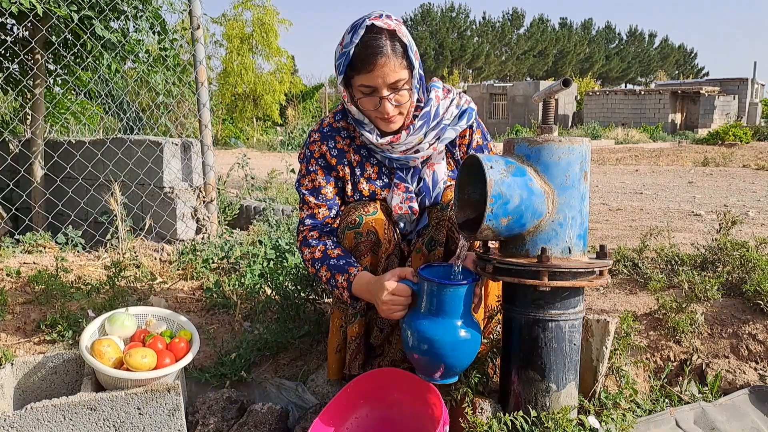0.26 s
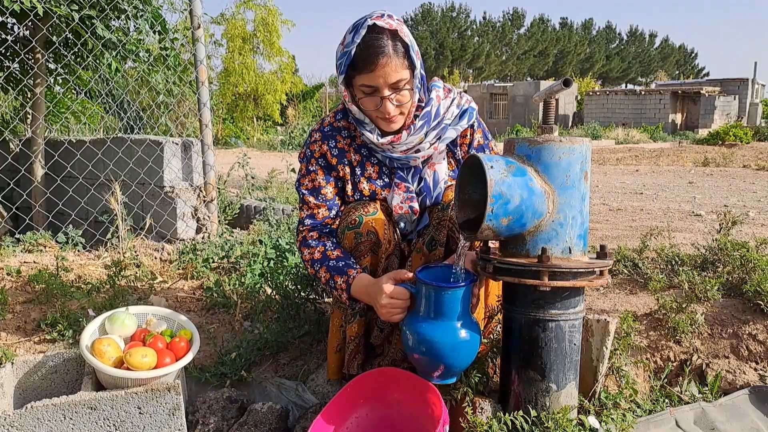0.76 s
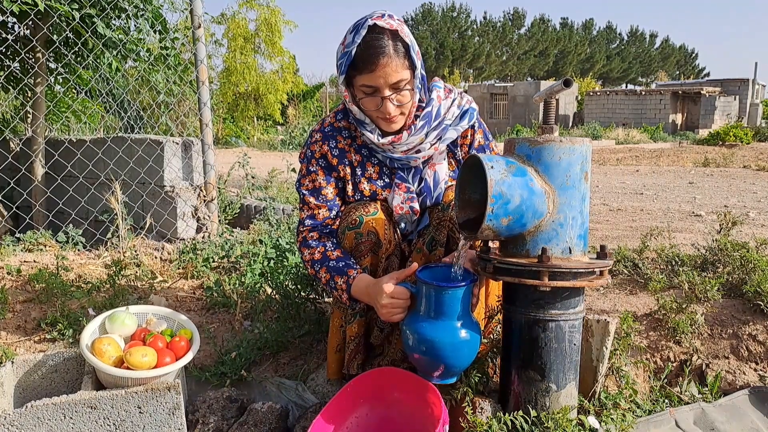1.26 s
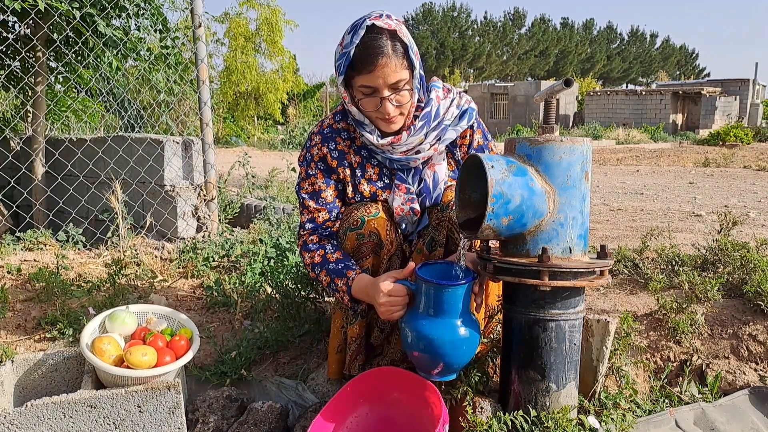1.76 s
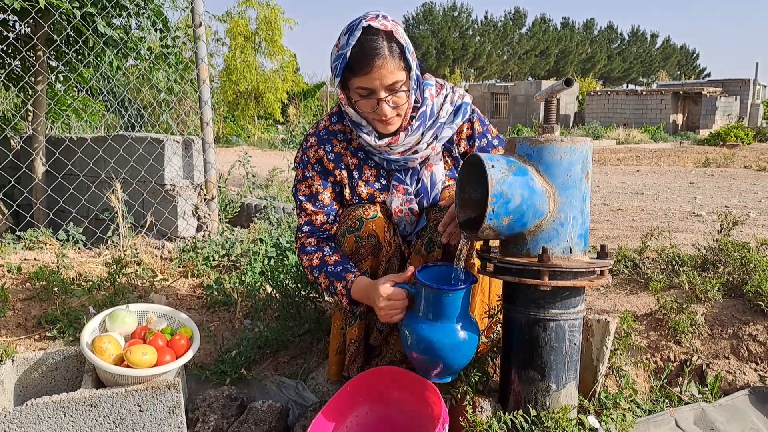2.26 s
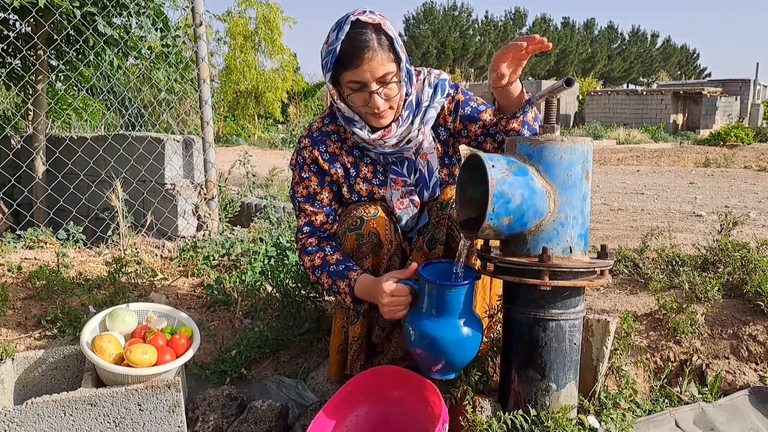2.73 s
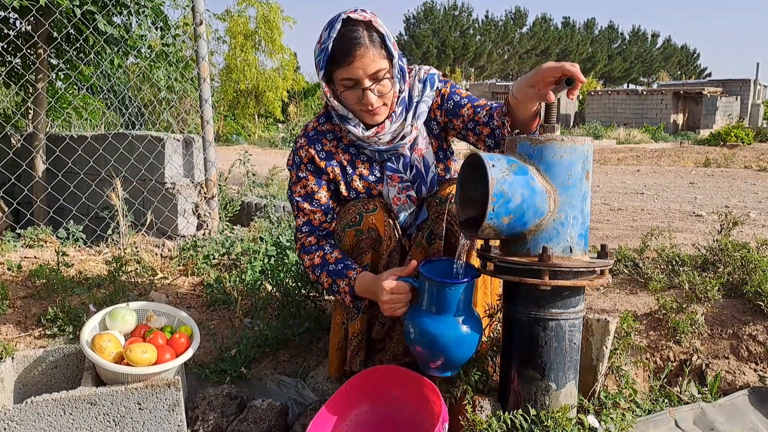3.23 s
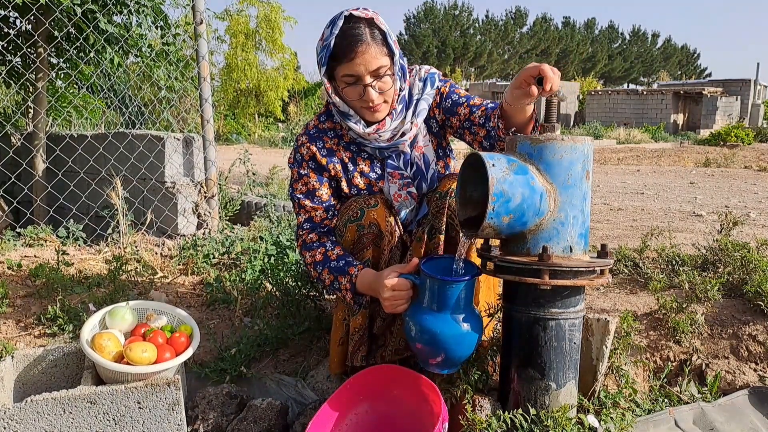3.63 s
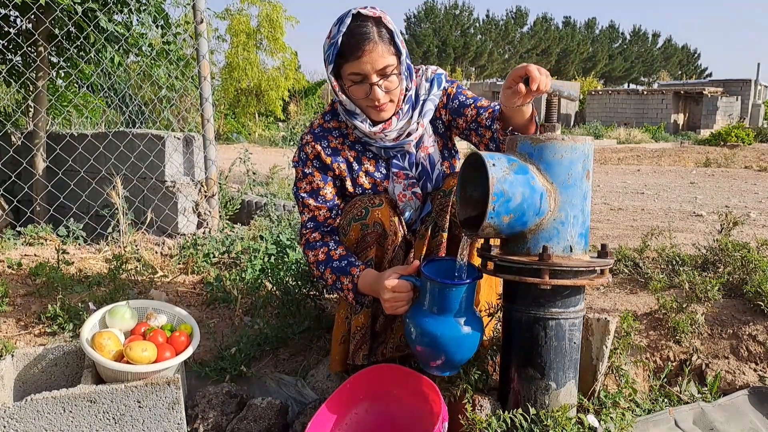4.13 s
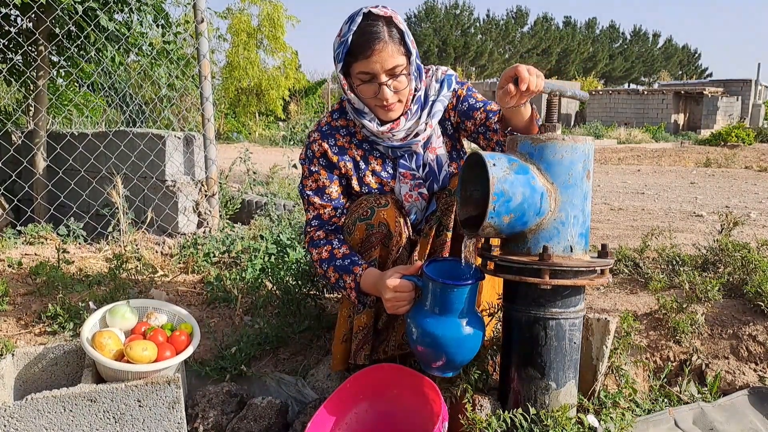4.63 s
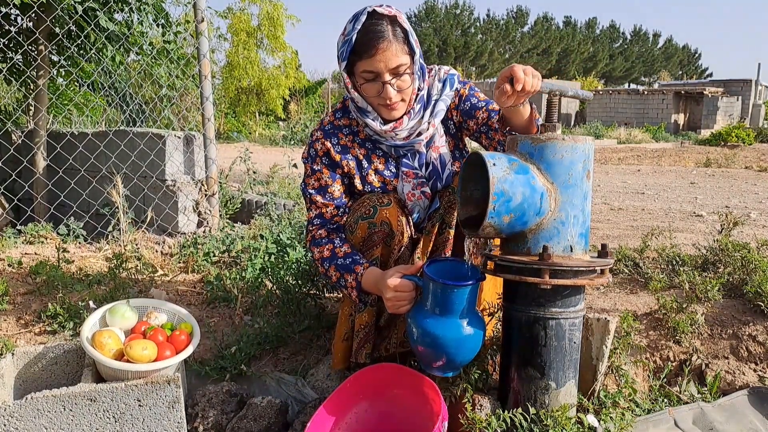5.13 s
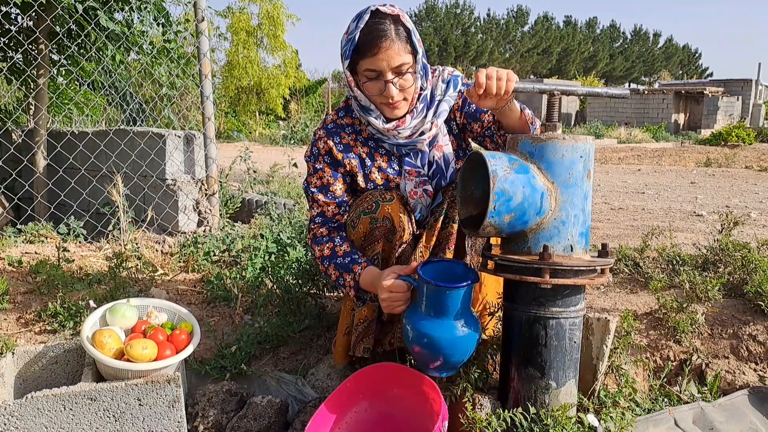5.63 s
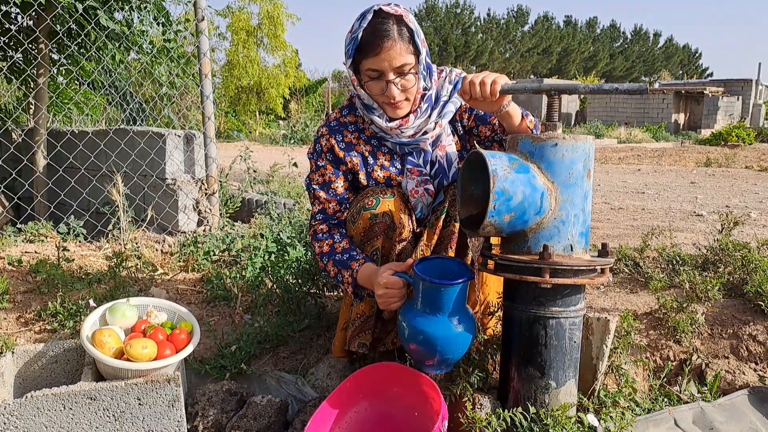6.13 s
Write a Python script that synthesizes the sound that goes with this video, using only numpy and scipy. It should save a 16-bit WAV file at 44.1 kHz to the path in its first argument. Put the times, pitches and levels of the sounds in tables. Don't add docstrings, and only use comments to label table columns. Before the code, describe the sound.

Near, dry outdoor stereo sound, with a deep, slightly wavering motor hum far away and soft low breeze throughout. From 0 s a modest stream falls into a hollow jug, with glugging gulps, tiny wall pings and crisp spitting drops; at about 0.4 s a hand's grip stutters dully on the jug. Gulps rise a little in pitch and are strongest from 1.2 to 2 s. At 1.4 s the jug strikes the pipe: one hard, rattling metallic knock with a short ring, spill and slosh. From about 2.8 s, gulps thin out and the jug's ringing shifts brighter; small gurgles and quick, higher plops take over. A busy burst of plops and sharp splats comes around 4.6 to 5.1 s. After 5.2 s the stream weakens, with a dull slosh near 5.4 s, then only sparse fine drips. At about 6.2 s a sleeve rustles faintly over metal, until 6.4 s.

```python
import sys
import numpy as np
from scipy import signal
from scipy.fft import rfft, irfft, next_fast_len
from scipy.io import wavfile
from scipy.ndimage import uniform_filter1d

SR = 44100
rng = np.random.default_rng(int(sys.argv[2]) if len(sys.argv) > 2 else 0)


def wav_out(sig):
    wavfile.write(sys.argv[1], SR, np.round(np.clip(np.atleast_2d(sig).T, -1, 1) * 32767).astype(np.int16))


def to_linear_factor(level_db):
    exponent = np.asarray(level_db, float) / 20
    return 10 ** exponent


N = 281799
TIME = np.arange(N) / SR
PUFF_TIME = np.arange(1500) / SR

# time in seconds, level in dB.
STREAM = [(0.0, -63), (0.85, -62), (1.57, -58), (1.78, -63), (2.42, -58), (3.01, -65.5), (3.2, -61),
          (3.43, -62.5), (3.88, -62.5), (4.04, -63.5), (4.4, -64), (4.63, -63.5), (4.95, -60),
          (5.18, -64.5), (5.37, -66), (5.63, -72), (5.8, -67.5), (6.19, -78.5)]
# pitch in Hz, width in Hz, level in dB.
WATER_SURFACE = [(1050, 430, 0.5), (1600, 210, -1), (2000, 270, 0)]
# start in seconds, end in seconds, pitch in Hz,
# drift in Hz per second, level in dB, fade in dB per second.
CROSS_RINGS = [
    (0, 3.8, 1728, -41, -63, -2.5),
    (2.85, 4.7, 2087, 30, -59.5, -4),
]
# pitch in Hz, width in Hz, level in dB.
WALL_UPRIGHT = [(3140, 94, 6), (3450, 360, -1), (3770, 420, 1.5)]
WALL_LEANING = [(2980, 220, 1.8), (3460, 250, 7), (3750, 340, 1)]
WALL_NEARLY_FULL = [(3020, 470, 4.5), (3400, 230, -6), (4080, 190, 0)]
# time in seconds, peak in dB, pitch in Hz.
LARGE_GULPS = [(0.046, -32, 511), (0.341, -38.5, 518), (0.457, -37, 454), (0.658, -36, 624),
               (0.781, -34.5, 637), (0.826, -33, 613), (0.851, -34, 646), (1.05, -33, 595),
               (1.158, -33.5, 607), (1.233, -32.5, 617), (1.253, -27.5, 621), (1.292, -35, 640),
               (1.474, -25, 597), (1.515, -32.5, 630), (1.669, -27.5, 634), (1.788, -32, 623),
               (1.873, -33, 665), (1.925, -33, 660), (1.951, -26, 630), (1.987, -31, 640), (2.02, -34, 693),
               (2.09, -36, 660), (2.145, -35, 612), (2.464, -39, 617), (2.523, -38, 660), (2.643, -34, 710),
               (2.822, -39, 667), (2.946, -38.5, 690), (3.105, -39, 665), (3.172, -35.5, 688)]
# time in seconds, peak in dB.
LITTLE_GULPS = [(.095, -40), (.51, -43), (.619, -39), (.704, -42), (.98, -43), (1.1, -50), (1.36, -47),
                (1.61, -37.5), (1.73, -40.5), (2.054, -41), (2.12, -38), (2.252, -40), (2.33, -53),
                (2.44, -43), (2.55, -38), (2.58, -48), (3.35, -41)]
# time in seconds, peak in dB, pitch in Hz.
DEEP_PLOPS = [(2.798, -38.5, 940), (3.942, -35.5, 1130), (3.992, -41.5, 710), (4.108, -40.5, 1046),
              (4.288, -39, 980), (4.472, -38.5, 1190), (4.76, -37.5, 1075), (5.039, -37, 1095),
              (5.262, -39, 1160), (4.605, -30, 1017), (4.83, -39, 950), (4.851, -33, 600),
              (4.853, -32.5, 1000), (4.25, -39, 1090), (4.31, -39, 1050), (4.66, -41, 1050),
              (4.9, -42, 980), (4.882, -31, 1050), (4.989, -36, 1000), (5.02, -38, 830), (5.098, -33, 1016),
              (5.305, -34.5, 967), (5.326, -39.5, 890)]
# time in seconds, peak in dB, pitch in Hz.
SMALL_BUBBLES = [(0.0481, -38.5, 1675), (0.249, -46.5, 1700), (0.4184, -48, 3730), (0.6176, -44.5, 3140),
                 (0.854, -44, 2760), (1.186, -46, 3700), (1.3416, -45, 3100), (1.4099, -26.5, 1660),
                 (1.5878, -39, 1680), (1.713, -44, 3150), (1.9711, -43, 2120), (2.285, -44, 3070),
                 (2.398, -41.5, 1660), (2.4185, -46, 3160), (2.5566, -52, 1560), (2.6923, -42.5, 2140),
                 (2.985, -42, 2090), (3.012, -41, 3000), (3.012, -41, 1510), (3.467, -37, 2000),
                 (3.5568, -41, 2090), (3.697, -46, 3440), (3.8394, -42.5, 2140), (3.886, -38, 2130),
                 (3.9684, -50, 1660), (3.985, -41, 2130), (3.621, -44, 2150), (4.32, -45, 3450),
                 (4.511, -50, 3400), (4.586, -43, 3460), (4.599, -36, 2130), (4.958, -47, 3500),
                 (6.2884, -43, 2800)]
# time in seconds, peak in dB, pitch in Hz.
WALL_PINGS = [(0.0365, -43, 3210), (0.1039, -51, 3130), (0.2503, -39, 3690), (0.4815, -52, 3770),
              (0.4963, -44, 2700), (0.5494, -45, 3140), (0.5776, -44, 3130), (0.6958, -63, 3140),
              (0.8, -50, 3250), (0.852, -40.5, 3800), (1.0021, -48, 3180), (1.214, -49, 3700),
              (1.274, -49, 3140), (1.512, -43, 3130), (1.586, -44, 3140), (1.672, -48, 3140),
              (1.6901, -46, 3050), (1.7659, -47, 3200), (1.8018, -43, 3170), (1.9505, -53, 3050),
              (2.138, -46, 3130), (2.5206, -44, 3120), (2.558, -43.5, 3210), (2.6932, -43, 3100),
              (3.011, -50, 2980), (3.2725, -47, 4160), (3.431, -46, 3020), (3.4752, -39.5, 3370),
              (3.5284, -47.5, 3410), (3.602, -46, 3420), (3.7628, -50, 3450), (3.8646, -44.5, 3530),
              (3.8851, -45.5, 3020), (3.9928, -50, 3440), (4.0307, -49, 2990), (4.1325, -44.5, 3460),
              (4.2757, -46, 3400), (4.491, -52, 3450), (4.545, -44, 3750), (4.6354, -48, 3400),
              (4.6568, -46, 3530), (4.7401, -48, 3430), (4.8818, -47, 3390), (5.0904, -49, 3970),
              (5.132, -49, 3750), (6.2707, -51, 3200), (6.2872, -46, 3000)]
# pitch in Hz, width in Hz, level in dB.
PING_SPLASH = [(1700, 980, -6.5), (2700, 540, 0.5), (3550, 1040, 3.5), (5170, 1900, -4.5)]
# time in seconds, peak in dB, pitch in Hz.
GURGLE_BUBBLES = [(0.483, -44.5, 1240), (0.618, -41.5, 1110), (0.72, -46, 1170), (0.928, -42.5, 1080),
                  (1.157, -44, 1110), (1.965, -39, 1040), (2.347, -43.5, 990), (2.481, -45, 1060),
                  (2.742, -41.5, 781), (2.823, -42, 1000), (2.989, -41, 1070), (3.073, -40.5, 1050),
                  (3.284, -42, 870), (3.434, -43, 866), (3.494, -45.5, 1160), (3.536, -52, 940),
                  (3.553, -45, 950), (3.572, -44, 835), (3.617, -44, 781), (3.649, -49, 950),
                  (3.711, -46, 870), (3.755, -41, 781), (3.801, -46, 861), (3.876, -45, 834),
                  (4.027, -42, 990), (4.063, -42.5, 870), (4.147, -51, 1110), (4.163, -47, 969),
                  (4.202, -48, 1100), (4.344, -46, 1020), (4.458, -43.5, 1200), (4.522, -47, 1150),
                  (4.554, -44, 947), (4.566, -43, 1080), (4.642, -46, 1140), (4.704, -44, 834),
                  (4.795, -47, 1230), (4.965, -45, 1000), (5.137, -51, 1170), (5.171, -45, 1120),
                  (5.361, -48, 1166), (5.399, -45, 991), (5.45, -44, 1170), (5.506, -49, 1200),
                  (5.535, -45.5, 940)]
# start in seconds, length in seconds, level in dB.
ROCKING = [
    (1.467, 0.35, -49.5),
    (2.3, 0.19, -54.5),
    (3.15, 0.14, -54),
    (3.55, 0.34, -61),
    (5.427, 0.18, -50.5),
]
# pitch in Hz, width in Hz, level in dB.
JUG_BELLY = [(180, 75, -1), (286, 190, -4)]
# pitch in Hz, width in Hz, level in dB.
DROPLETS = [(5360, 2600, -0.5), (6320, 690, 3.5), (7980, 1440, 8), (10970, 4400, 2), (11500, 2200, -1),
            (14800, 1400, -5)]
# time in seconds, peak in dB.
LARGE_DROPS = [(0.25, -39), (0.2554, -25.5), (0.291, -32), (0.433, -34.5), (0.5744, -35.5), (1.208, -36),
               (1.288, -35), (1.363, -34), (1.6912, -31.5), (2.0894, -39), (2.1239, -35), (2.331, -34),
               (2.3825, -32), (2.4207, -33), (2.458, -43), (2.58, -30.5), (2.9687, -35.5), (3.231, -31),
               (3.467, -35), (3.6465, -35.5), (3.83, -27), (3.88, -32.5), (3.935, -35), (4.0798, -34),
               (4.1316, -28.5), (4.1485, -28), (4.879, -25), (4.9762, -28.5), (5.097, -31), (5.724, -37.5),
               (6.12, -39.5)]
# time in seconds, peak in dB.
SPOUT_DROPS = [(0.092, -31.5), (0.3433, -35), (0.851, -37), (0.8776, -27), (1.1009, -40), (1.523, -29),
               (1.5587, -32.5), (1.672, -32), (1.792, -34), (1.952, -35.5), (2.0506, -33.5),
               (2.5307, -26.5), (2.699, -30), (2.899, -36.5), (3.2566, -34.5), (3.555, -29), (3.6924, -34),
               (3.986, -26.5), (4.0384, -34.5), (4.184, -35.5), (4.276, -37), (4.552, -34.5),
               (4.754, -28.5), (4.7902, -31), (4.8282, -24.5), (4.852, -29.5), (4.932, -35), (5.021, -32),
               (6.251, -38)]
# time in seconds, peak in dB, pitch in Hz.
FINE_DROPS = [(0.128, -39, 13900), (0.1855, -43, 11200), (0.2394, -51, 7650), (1.003, -39, 8700),
              (1.0196, -40, 7600), (1.1438, -40, 7640), (1.2506, -42, 8390), (1.504, -40, 12900),
              (1.8726, -39.5, 6200), (2.079, -39.5, 8610), (2.16, -39, 8550), (2.285, -43, 8340),
              (2.3181, -41, 8550), (2.4862, -35.5, 8200), (2.6798, -48, 10900), (2.8814, -45, 7900),
              (3.009, -40, 7850), (3.116, -37.5, 8480), (3.22, -38, 8010), (3.434, -39, 7860),
              (4.0228, -39, 7900), (4.115, -37.5, 8190), (4.358, -40.5, 8250), (4.452, -41.5, 5100),
              (4.6982, -43, 11200), (4.9067, -36, 10900), (4.9651, -35, 5010), (5.0784, -40, 7990),
              (5.1317, -43, 8700), (5.197, -39, 7830), (5.2614, -44, 11400), (5.2759, -42, 8260),
              (5.3252, -42, 11300), (5.3567, -52, 8150), (5.4141, -49, 11300), (5.454, -44, 12500),
              (5.4645, -45, 6300), (5.5134, -49, 6210), (5.706, -53, 7950), (5.7564, -55, 7850),
              (5.864, -47, 8530), (6.1439, -49, 11600), (6.201, -46, 12100), (6.243, -39.5, 10300),
              (6.271, -42, 12100), (6.289, -41, 12500), (6.302, -37, 13800), (6.3415, -38, 5600),
              (6.353, -38, 10700)]
# pitch in Hz, width in Hz, level in dB.
KNOCK_RATTLE = [(520, 300, -3), (980, 350, -16), (1660, 140, 0.5), (2230, 250, 4.5), (3310, 140, -5),
                (3410, 180, -3.5), (4400, 760, -20), (5550, 470, -9.5), (6630, 1000, -7), (8200, 2500, -18)]
# pitch in Hz, level in dB, time to fade by 60 dB in seconds.
PIPE_RING = [(1700, -36, .16), (2150, -31.5, 0.21), (3435, -32, 0.1), (4280, -51, 0.038), (6600, -37, .1)]
# time in seconds, level in dB.
GRIP_SHIFT = [(.39, -50), (.399, -40), (.406, -38), (.42, -43), (.434, -37.5), (.448, -42), (.46, -36.5),
              (.468, -41), (0.474, -60), (.5, -70)]
# time in seconds, level in dB.
SLEEVE_BRUSH = [(6.2, -81), (6.235, -66), (6.248, -58), (6.28, -57), (6.31, -64), (6.335, -55), (6.39, -59)]
# time in seconds, level in dB.
MOTOR_HUM = [(0.0, -41), (0.09, -44), (0.16, -67), (0.28, -37.5), (0.51, -47), (0.62, -39.5), (0.76, -42.5),
             (1.3, -32.5), (2.47, -35.5), (2.7, -43), (3.13, -36), (3.84, -32.5), (4.36, -41),
             (5.71, -32.5), (6.21, -35), (6.39, -43)]
# pitch in Hz, level in dB.
SHAFT_HUMS = [(50, -53), (68, -55), (138, -65.5)]
# pitch in Hz, level in dB per Hz.
AIR_COLOUR = [(12, -82), (26, -39), (40, -24), (58, -7), (91, -5.5), (113, -17), (165, -23), (330, -28),
              (700, -29), (1400, -31), (2050, -33.5), (2500, -37), (3800, -48), (5000, -53), (9000, -56),
              (16000, -58)]
# pitch in Hz, likeness from 0 to 1.
AIR_LIKENESS = [(60, 0.85), (180, 1), (550, 0.57), (1650, 0.015), (4970, 0.26), (15000, 0.01)]
# pitch in Hz, left over right in dB.
PORT_COLOUR = [(60, 2.5), (110, 1.5), (200, 1.5), (380, 2.5), (700, 2), (1290, 2.5), (2380, 10.5),
               (4400, 0.5), (8120, 0.5), (15000, 1)]
# pitch in Hz, width in Hz, depth in dB.
BODY_SHADOW = (2390, 387, -9.5)


def evened(x):
    return x / np.sqrt(np.mean(x ** 2) + 1e-20)


def wander(x, width):
    return evened(uniform_filter1d(uniform_filter1d(x, width), width))


def read(points, hz):
    f, value = np.transpose(points)
    return np.interp(np.log(hz + 1), np.log(f + 1), value)


def curve(rows):
    s, db = np.transpose(rows)
    return np.interp(TIME, s, db)


def add(mix, s, sound):
    part = mix[max(round(s * SR), 0):][:len(sound)]
    part += sound[:len(part)]


def resonate(x, hz, width):
    turn = np.exp(2j * np.pi * np.cumsum(hz * np.ones(len(x))) / SR)
    r = np.exp(-np.pi * width / SR)
    return 2 * (turn * signal.lfilter([1 - r], [1, -r], x * turn.conj())).real


def modes(x, table):
    size = next_fast_len(len(x) + 600)
    f = np.fft.rfftfreq(size, 1 / SR)
    gain = 0
    for hz, width, db in table:
        off = 2j * (f - hz) / width
        gain = gain + to_linear_factor(db) / (1 + off) / (1 + off / 2)
    return irfft(rfft(x, size) * gain, size)[:len(x)]


def patter(per_s, spread_db, puff_s):
    chance = rng.random(N)
    hit = chance < per_s / SR
    hits = np.zeros(N)
    hits[hit] = to_linear_factor(2 * spread_db * np.minimum(-np.log(chance[hit] * SR / per_s + 1e-9), 4))
    fade, swell = np.exp(-1 / (puff_s * SR)), np.exp(-2.5 / (puff_s * SR))
    power = signal.lfilter([1], np.convolve([1, -fade], [1, -swell]), hits)
    return evened(np.sqrt(abs(power) + 1e-12) * rng.standard_normal(N))


def flow_db():
    return curve(STREAM) + 60


def neck_pitch(s):
    return 665 - 136 * np.exp(-s / 1.1)


def bubble(db, hz, t60, rise_s, glide):
    t = np.arange(int(np.clip(t60, .005, .09) * SR)) / SR
    shape = (1 - np.exp(-t / rise_s)) ** 2 * to_linear_factor(-60 * t / max(t60, .005))
    return to_linear_factor(db) * shape / shape.max() * np.sin(2 * np.pi * hz * t * (1 + glide * t))


def fizz(low_hz, high_hz, per_s, cycles, spread_db):
    out = np.zeros(N)
    for s, pitch, size in rng.random((int(per_s * N / SR), 3)):
        hz = low_hz * (high_hz / low_hz) ** pitch
        db = -spread_db * np.log(max(size, .02))
        add(out, s * N / SR, bubble(db, hz, cycles / hz, rise_s=1.1 / hz, glide=8.8))
    return evened(out)


def neck_ring(churn, boom_db):
    sips = (rng.random(N) < 110 / SR) * rng.uniform(-1.7, 1.84, N)
    hz = neck_pitch(TIME) * (1 + 0.057 * wander(rng.standard_normal(N), 900))
    push = churn + 40 * to_linear_factor(-10.5 + 0.35 * boom_db) * sips
    return evened(resonate(resonate(push, hz, 68), hz, 210))


def cross_ring(drum):
    out = np.zeros(N)
    for start, end, hz, drift, db, fade in CROSS_RINGS:
        part = drum[round(start * SR):round(end * SR)]
        since = np.arange(len(part)) / SR
        heard = np.clip(np.minimum(since + 0.055, since[::-1]) / 0.16, 0, 1)
        ring_hz = hz + drift * since
        ring = resonate(resonate(part, ring_hz, 99), ring_hz, 260)
        add(out, start, heard * to_linear_factor(db + fade * since) * evened(ring))
    return out


def wall_ring(taps):
    tipped, full = (.5 + .5 * np.tanh((TIME - s) / 0.12) for s in (2.8, 5.38))
    upright = (1 - tipped) * modes(taps, WALL_UPRIGHT)
    leaning = tipped * (1 - full) * modes(taps, WALL_LEANING)
    return evened(upright + leaning + full * modes(taps, WALL_NEARLY_FULL))


def churning():
    flow = flow_db()
    churn = patter(99, spread_db=0.5, puff_s=0.019) + 0.52 * rng.standard_normal(N)
    drum = patter(160, spread_db=2.0, puff_s=0.0061) + 0.28 * rng.standard_normal(N)
    boom_db = 8.5 * np.exp(-((TIME - 1.63) / 1.74) ** 2)
    neck = to_linear_factor(-61 + 0.2 * flow + boom_db) * neck_ring(churn, boom_db)
    surface = evened(modes(drum + 1.54 * churn, WATER_SURFACE))
    gurgle = 0.95 * fizz(760, 1500, 220, cycles=14.0, spread_db=3.2) + 0.97 * surface
    gurgle *= to_linear_factor(-64.5 + flow + 1.5 * TIME)
    cross_lumps, wall_lumps = (to_linear_factor(3.5 * wander(v, 1800)) for v in (churn, drum))
    cross = to_linear_factor(0.12 * flow - 1.5) * cross_lumps * cross_ring(drum)
    taps = drum + 0.77 * churn + to_linear_factor(-13) * fizz(2900, 4050, 90, cycles=23.0, spread_db=2.0)
    wall = to_linear_factor(-63 + 0.79 * flow) * wall_lumps * wall_ring(taps)
    return neck + gurgle + cross + wall


def noise_puff():
    return rng.standard_normal(len(PUFF_TIME))


def splash(db, t60, rough):
    return to_linear_factor(db - 60 * PUFF_TIME / t60) * evened(rough)


def gulps():
    out = np.zeros(N)
    for s, db, hz in LARGE_GULPS + [(s, db, neck_pitch(s)) for s, db in LITTLE_GULPS]:
        add(out, s - .002, bubble(db - 3.5, hz, 23 / hz, rise_s=0.0046, glide=0.75))
        add(out, s - .001, splash(db - 14, 0.032, resonate(noise_puff(), 0.25 * hz, 660)))
    return out


def plops():
    out = np.zeros(N)
    for s, db, hz in DEEP_PLOPS:
        add(out, s - .001, bubble(db - 2.5, hz, 29 / hz, rise_s=0.00089, glide=3.1))
        add(out, s - .001, splash(db - 13, 0.054, modes(noise_puff(), [(0.8 * hz, 450, 0)])))
    return out


def blips():
    out = np.zeros(N)
    for s, db, hz in SMALL_BUBBLES:
        add(out, s - .001, bubble(db - 0.5, hz, 0.031, rise_s=0.00019, glide=1.7))
        add(out, s - .001, splash(db - 9, 0.064, modes(noise_puff(), [(hz, 900, 0)])))
    return out


def pings():
    out = np.zeros(N)
    for s, db, hz in WALL_PINGS:
        add(out, s - .001, splash(db - 6.5, 0.04, modes(noise_puff(), PING_SPLASH)))
        add(out, s - .001, bubble(db - 6, hz, 0.045, rise_s=0.00063, glide=0.38))
    return out


def burbles():
    out, swell = np.zeros(N), np.minimum(PUFF_TIME / 0.0034, 1)
    for s, db, hz in GURGLE_BUBBLES:
        add(out, s - .001, swell * splash(db - 13.5, 0.045, modes(noise_puff(), [(hz, 900, 0)])))
        add(out, s - .002, bubble(db - 3, 0.971 * hz, 26 / hz, rise_s=0.0013, glide=5.8))
    return out


def slosh():
    out = np.zeros(N)
    lumps = evened(modes(patter(60, spread_db=2.0, puff_s=0.011), JUG_BELLY))
    for start, length, db in ROCKING:
        part = lumps[round(start * SR):round((start + length) * SR)]
        add(out, start, to_linear_factor(db) * np.hanning(len(part)) * part)
    return out


def spray():
    flow = flow_db()
    shared = patter(320, spread_db=4.0, puff_s=0.0014)
    hiss = np.zeros(N)
    for k in range(3):
        own = patter(120, spread_db=4.5, puff_s=0.00071)
        hiss += modes(shared + 0.76 * own, DROPLETS[k::3])
    mist = evened(modes(rng.standard_normal(N), DROPLETS[:3]))
    return to_linear_factor(-60.5 + 1.14 * flow) * evened(hiss) + to_linear_factor(-71.5 + 0.8 * flow) * mist


def drops_list():
    large_hz, small_hz, strays = 7970, 11640, 10
    rows = [(s, db, large_hz) for s, db in LARGE_DROPS] + [(s, db, small_hz) for s, db in SPOUT_DROPS]
    rows += [(s, db + 1.5, hz) for s, db, hz in FINE_DROPS]
    flow = flow_db()
    for k, (moment, strength, kind) in enumerate(rng.random((strays, 3))):
        at = (k + moment) * N / strays
        db = -34 + 2 * flow[int(at)] - 2 * (2 * strength - 1)
        rows.append((at / SR, db, large_hz if kind < .5 else small_hz))
    return rows


def splats():
    out, rise = np.zeros(N), PUFF_TIME / .0014
    shape = rise * np.exp(1 - rise) + to_linear_factor(-17 - 60 * PUFF_TIME / 0.16) * np.minimum(rise, 1)
    for s, db, hz in drops_list():
        hz = hz * (1 + 0.063 * rng.standard_normal())
        puff = noise_puff() * to_linear_factor(3.5 * evened(uniform_filter1d(noise_puff(), 30)))
        wide = to_linear_factor(4 + 0.35 * (db + 30)) * evened(modes(puff, DROPLETS))
        pitched = evened(modes(puff, [(hz, 2200, 0)]))
        add(out, s - .0015, to_linear_factor(db - 14.5) * shape * evened(wide + pitched))
    return out


def knock():
    out, t, at = np.zeros(N), np.arange(6000) / SR, 1.4085
    noise = rng.standard_normal((3, 6000))
    blows = to_linear_factor(-60 * t / 0.023) + to_linear_factor(-13 - 60 * t / 0.32)
    rattle = modes(blows * noise[0], KNOCK_RATTLE)
    crack = evened(modes(noise[1], [(11700, 1500, -4.5), (7640, 660, -6.5)]))
    crack *= to_linear_factor(-60 * t / 0.01)
    spill = evened(modes(noise[2], [(6200, 14000, -1.5), (11300, 5600, -1.5)]))
    spill *= to_linear_factor(-18.5 - 60 * t / 0.17)
    thud = to_linear_factor(-60 * t / 0.035) * np.minimum(t / 0.0045, 1) * -np.sin(2 * np.pi * 190 * t)
    hit = to_linear_factor(-8.5) * rattle + to_linear_factor(-15) * (crack + spill) + to_linear_factor(-17.5) * thud
    add(out, at, np.minimum(t / 0.00091, 1) * hit)
    for hz, db, t60 in PIPE_RING:
        add(out, at, to_linear_factor(db - 60 * t / t60) * np.sin(2 * np.pi * hz * t))
    return out


def grip():
    s, db = np.transpose(GRIP_SHIFT)
    t, out = np.arange(s[0], s[-1], 1 / SR), np.zeros(N)
    uneven = evened(uniform_filter1d(rng.standard_normal(len(t)), 300))
    turns = np.cumsum(231 * (1 + 0.06 * uneven)) / SR
    slips = (np.diff(turns // 1, prepend=0) > 0) * rng.uniform(0.35, 0.84, len(t))
    slips += 0.023 * rng.standard_normal(len(t))
    body = modes(slips, [(240, 170, 2.5), (350, 64, 7), (456, 160, 1.5), (660, 200, -12)])
    add(out, s[0], to_linear_factor(np.interp(t, s, db)) * evened(body) * signal.windows.tukey(len(t), .1))
    return out


def sleeve():
    s, db = np.transpose(SLEEVE_BRUSH)
    level_db = np.interp(TIME, s, db, left=-120)
    grains = patter(1500, spread_db=3.0, puff_s=0.0014)
    return to_linear_factor(level_db) * evened(modes(grains, [(6200, 2200, -13), (8500, 2100, -8), (13000, 6500, 3)]))


def ports(x, lag_s):
    taps = np.sinc(np.arange(96) - 40 - SR * np.array([[lag_s], [0]])) * np.hanning(96)
    return signal.oaconvolve(x[None], taps, axes=1)[:, 40:N + 40]


def yard(x):
    t, sets = np.arange(2000) / SR, 4
    echoes = rng.choice([-1., 1.], (sets, 2, 2000)) * (rng.random((sets, 2, 2000)) < .08)
    echoes *= to_linear_factor(-60 * t / .018) * (t > .0003)
    echoes *= to_linear_factor(3.0) / np.linalg.norm(echoes, axis=2, keepdims=True)
    path = np.repeat(rng.integers(0, sets, N // 300 + 1), 300)[:N]
    x = signal.lfilter(*signal.butter(2, 1100, "high", fs=SR), x)
    out = np.zeros((2, N))
    for k, echo in enumerate(echoes):
        part = x * uniform_filter1d(1. * (path == k), 100)
        out += signal.oaconvolve(part[None], echo, axes=1)[:, :N]
    return out


def hum(hz, level_db):
    return np.sqrt(2) * to_linear_factor(level_db) * np.sin(2 * np.pi * np.cumsum(hz * np.ones(N)) / SR)


def motor():
    waver = rng.standard_normal((N // 100 + 1, 5))
    waver = evened(uniform_filter1d(uniform_filter1d(waver, 90, 0), 90, 0))
    waver = uniform_filter1d(np.repeat(waver, 100, 0)[:N].T, 200)
    flutter = wander(rng.standard_normal(N), 2200)
    main = hum(83.1 + 0.892 * np.tanh((TIME - 3) / 0.35), curve(MOTOR_HUM) + 1.15 * flutter)
    drone_db = -55.5 + 1.5 * np.exp(-((TIME - 4) / .35) ** 2) + 2.7 * waver[3]
    drone = hum(94.7 + 3.6 * TIME, drone_db)
    faint = sum(hum(hz, db + 3.1 * w) for (hz, db), w in zip(SHAFT_HUMS, waver))
    return main + drone + faint


def open_air():
    frames, hz = N // 512 + 5, np.fft.rfftfreq(2048, 1 / SR)
    a, b, c, d, patches = rng.standard_normal((frames, 1025, 5)).T
    patches = evened(uniform_filter1d(uniform_filter1d(patches, 16, 0), 8, 1))
    same = np.clip(read(AIR_LIKENESS, hz), -1, 1)[:, None]
    left = a + 1j * b
    right = same * left + np.sqrt(1 - same ** 2) * (c + 1j * d)
    z = np.array([left, right]) * to_linear_factor(read(AIR_COLOUR, hz)[:, None] + 2.0 * patches)
    return to_linear_factor(-44.5) * evened(signal.istft(z, nperseg=2048, noverlap=1536)[1][:, :N])


def scene():
    blow = knock()
    jug = churning() + gulps() + plops() + blips() + pings() + burbles() + grip() + slosh()
    drops = spray() + splats() + blow + sleeve()
    direct = ports(jug, lag_s=0.00013) + ports(drops, lag_s=0.0002143)
    return direct + yard(jug + drops - .5 * blow) + motor() + open_air()


def band_limit(x):
    return signal.sosfilt(signal.butter(12, 16740, fs=SR, output="sos"), x)


def record(dry):
    size = next_fast_len(N)
    hz = np.fft.rfftfreq(size, 1 / SR)
    dip_hz, width, dip_db = BODY_SHADOW
    shade_db = dip_db * np.exp(-((hz - dip_hz) / width) ** 2)
    shade_db -= 30 * np.clip((hz - 15550) / 420, 0, 2)
    colour = to_linear_factor(shade_db + read(PORT_COLOUR, hz) / 2 * np.array([[1], [-1]]))
    mix = irfft(rfft(dry, size) * colour, size)[:, :N]
    return band_limit(mix)


dry = scene()
out = record(dry)
wav_out(out)
```